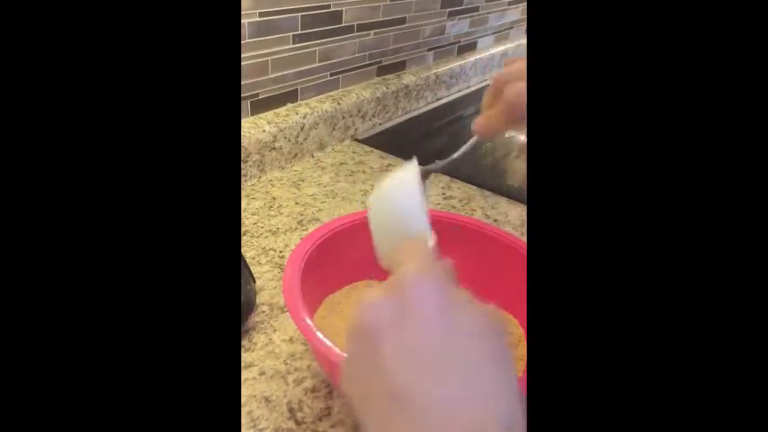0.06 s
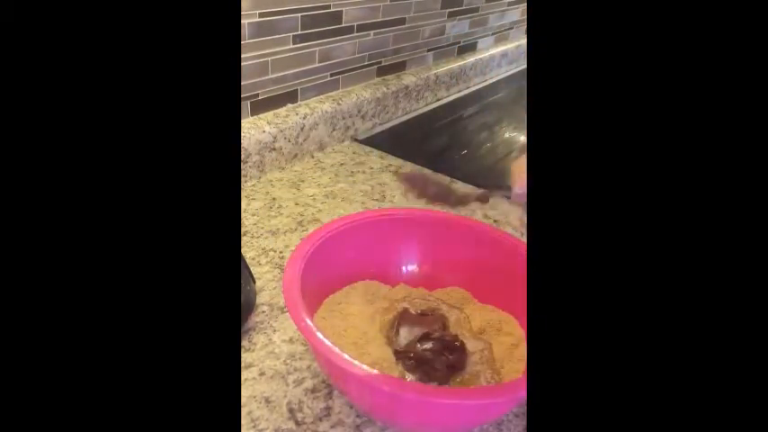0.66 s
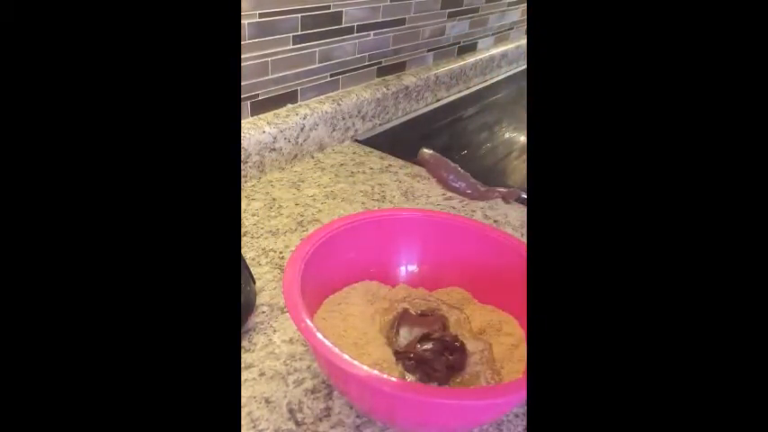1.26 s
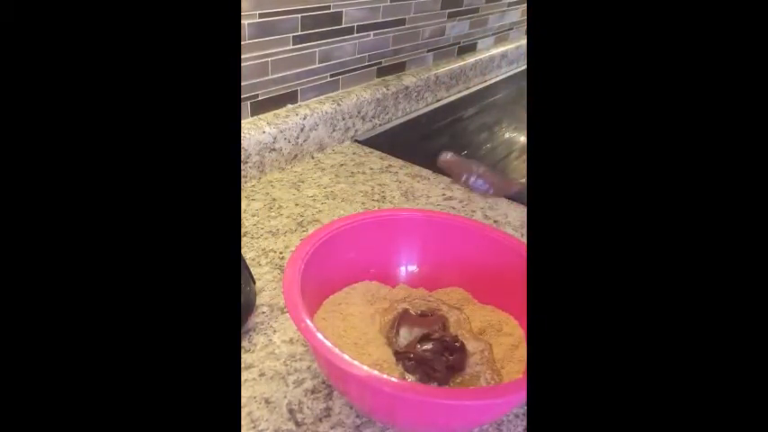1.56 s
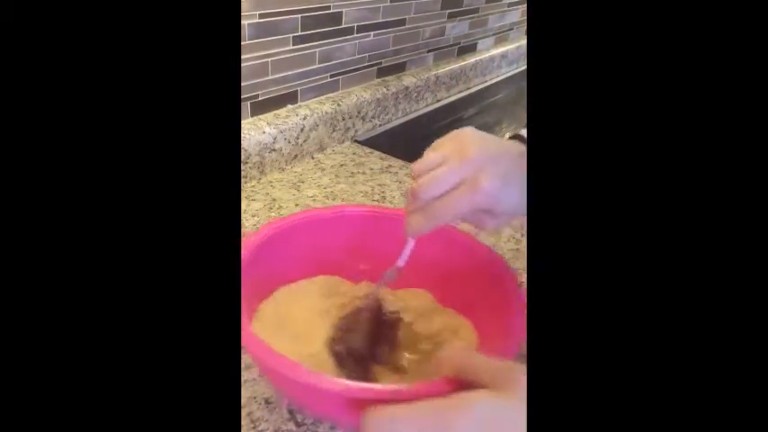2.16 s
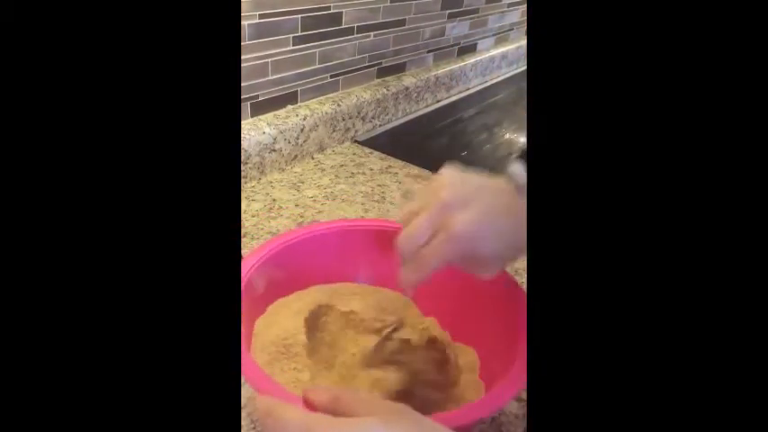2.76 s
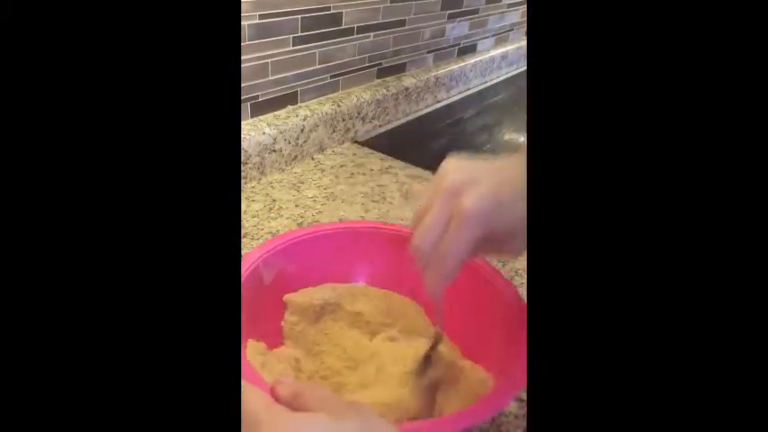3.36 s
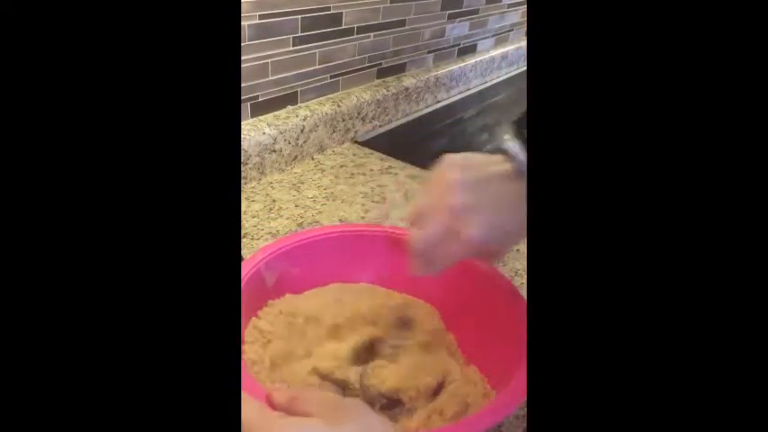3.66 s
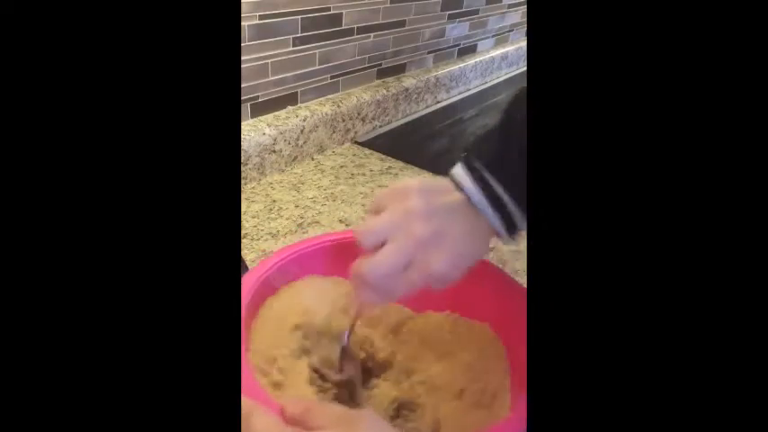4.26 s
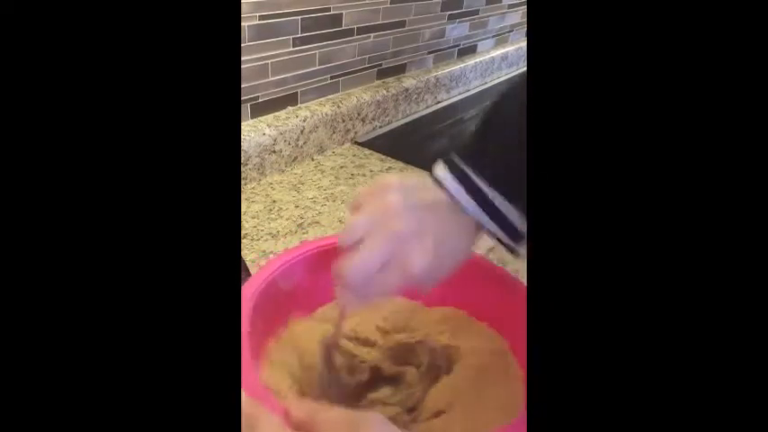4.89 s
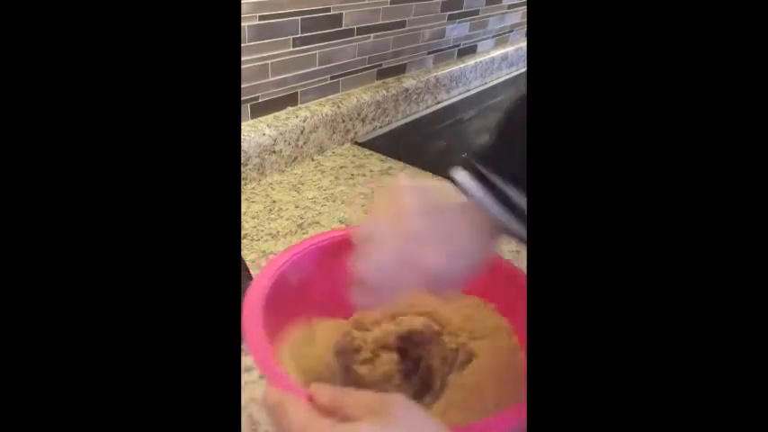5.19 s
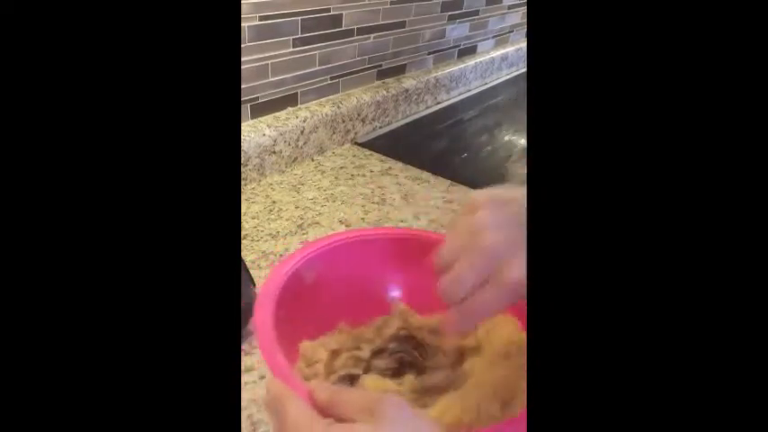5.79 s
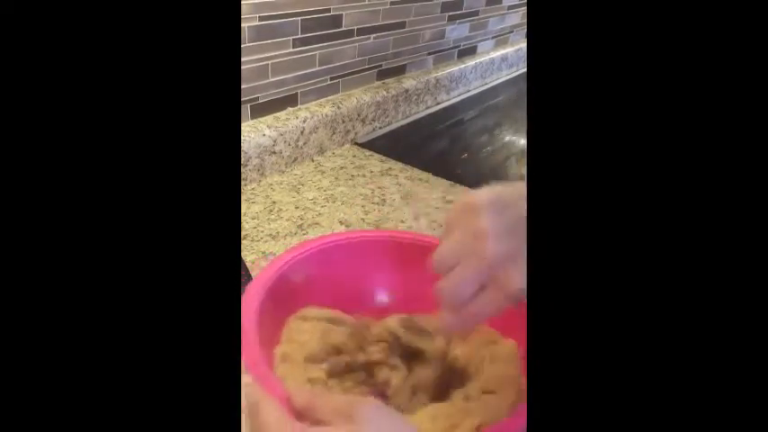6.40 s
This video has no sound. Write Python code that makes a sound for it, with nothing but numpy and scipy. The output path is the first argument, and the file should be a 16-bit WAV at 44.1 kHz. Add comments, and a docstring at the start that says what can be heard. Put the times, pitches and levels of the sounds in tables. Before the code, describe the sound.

A few light taps and a ringing scrape of a spoon in a cup are followed by a quiet moment and the clunk of the cup on a counter. Then dry, crumbly dough is stirred close by, the metal spoon skidding and knocking on the plastic bowl as the gritty crunch grows continuous. The bowl shifts with low bumps, and an appliance hums faintly in the small kitchen.

```python
"""Crumbly dough is stirred with a metal spoon in a plastic bowl. The crumbs crunch in many tiny clicks;
the spoon knocks, skids and rubs on the wall and makes it ring. Before that, the spoon taps and scrapes
out a cup and the cup is set down. The bowl bumps and judders on the stone counter of a small kitchen
with a short echo and a faint hum."""
import sys
import numpy as np
from scipy import signal
from scipy.fft import rfft, irfft
from scipy.io import wavfile
from scipy.ndimage import uniform_filter1d

SR = 44100
rng = np.random.default_rng(int(sys.argv[2]) if len(sys.argv) > 2 else 0)


def inscribe(sig):
    """Save sig as 16-bit PCM at rate SR to the path in sys.argv[1].

    A 1-D sig is mono; a 2-D sig holds one channel per row.
    Samples are clipped to [-1, 1] before scaling.
    """
    pcm = np.round(np.clip(np.atleast_2d(sig).T, -1, 1) * 32767)
    wavfile.write(sys.argv[1], SR, pcm.astype(np.int16))


N = 288414
TIME = np.arange(N) / SR
HIT_TIME = np.arange(SR // 4) / SR  # the clock for one hit
TOP_HZ = 9200  # upper limit of the treble


def gain_of(db):
    """Turns decibels into a multiplier."""
    return 10 ** (np.asarray(db) / 20)


def evened(x):
    """Scales x to an average (rms) level of 1."""
    return x / np.sqrt(np.mean(x ** 2) + 1e-20)


def look_up(points, hz):
    """Reads between a table's rows, on a scale of octaves."""
    row_hz, value = np.transpose(points)
    return np.interp(np.log(hz + 1), np.log(row_hz + 1), value)


def add(mix, start, sound):
    """Mixes a sound in at a start time in seconds."""
    part = mix[max(round(start * SR), 0):][:len(sound)]
    part += sound[:len(part)]


def coloured(x, tone):
    """Shapes the bass, middle and treble of x to follow a table."""
    gains = gain_of(look_up(tone, np.fft.rfftfreq(len(x), 1 / SR)))
    return evened(irfft(rfft(x) * gains, len(x)))


def resonate(x, hz, width):
    """Lets x excite one note; a smaller width in Hz gives a purer note."""
    pole = np.exp((2j * np.pi * hz - np.pi * width) / SR)
    return evened(signal.lfilter([1], [1, -pole], x).real)


def clicks(per_s, spread_db):
    """Tiny clicks of uneven size at random moments."""
    size = gain_of(spread_db * np.minimum(rng.exponential(1, N), 4))
    return evened(size * rng.choice([-1, 1], N) * (rng.random(N) < per_s / SR))


def strike(notes, weight, cut_hz, scatter):
    """A struck object rings with its own fading notes; a soft hit leaves out the high ones."""
    hz, db, fade_s = np.transpose(notes)[:, :, None]
    size = gain_of(db) * weight / np.sqrt(1 + (hz / cut_hz) ** 4)
    # neighbouring notes swing opposite ways
    phase = np.pi * np.arange(len(hz))[:, None] + scatter * rng.standard_normal(hz.shape)
    swell = 1 - np.exp(-HIT_TIME * hz / 1.18)  # the treble arrives first
    fade = np.exp(-np.log(1000) * HIT_TIME / fade_s)
    ring = (size * swell * fade * np.sin(2 * np.pi * hz * HIT_TIME + phase)).sum(0)
    return ring / np.sqrt(np.mean(ring[:SR // 50] ** 2))  # level 1 over the first 20 ms


def shifting(x, depth_db):
    """The tone drifts at random as the spoon travels round the bowl."""
    bands = signal.stft(x, SR, nperseg=1024, noverlap=768)[2]
    patches = uniform_filter1d(rng.standard_normal(bands.shape), size=6, axis=0)
    patches = evened(uniform_filter1d(patches, size=14, axis=1))
    drifted = signal.istft(bands * gain_of(depth_db * patches), SR, nperseg=1024, noverlap=768)[1]
    return evened(drifted[:N])


def envelope(start, length, rise_s, fade_s):
    """A level that rises smoothly, holds and dies away."""
    t = np.maximum(TIME - start, 0)
    rise = np.sin(np.pi / 2 * np.minimum(t / rise_s, 1)) ** 2
    return rise * np.exp(-np.maximum(t - length, 0) / fade_s)


# the tone of the room's air: (frequency [Hz], relative level [dB])
AIR_TONE = [(15, -82.5), (25, -22.5), (102, -0.5), (130, -6), (151, -23), (184, -14), (308, -18.5),
            (332, -24.5), (394, -15.5), (543, -23.5), (599, -14), (678, -24), (934, -24), (1730, -28.5),
            (9000, -41.5), (11700, -84), (19800, -120)]
# an appliance's notes: (pitch [Hz], width [Hz], level [dB])
HUM_NOTES = [(56.3, 4.1, -81), (102.2, 3.5, -75), (907.6, 21, -84)]
def background():
    """Room air and the unsteady hum of an appliance."""
    hum = sum(gain_of(db) * resonate(resonate(rng.standard_normal(N), hz, width), hz, width)
              for hz, width, db in HUM_NOTES)
    return hum + gain_of(-69) * coloured(rng.standard_normal(N), AIR_TONE)


# how long the room echoes: (frequency [Hz], time to fade by 60 dB [s])
ECHO_TIMES = [(100, 0.38), (500, 0.42), (1100, 0.4), (1900, .29), (3000, 0.21), (8000, 0.17)]
def kitchen_echo(x):
    """Sound bounces off tiles and cupboards; the treble dies first."""
    bounces = rng.choice([-1., 1.], SR // 2) * (rng.random(SR // 2) < 3000 / SR)
    bounces[:SR // 125] = 0  # nothing returns for 8 ms
    hz, t, bands = signal.stft(bounces, SR, nperseg=256)
    fade = np.exp(-np.log(1000) * t / look_up(ECHO_TIMES, hz)[:, None])
    tail = signal.istft(bands * fade, SR, nperseg=256)[1]
    return signal.fftconvolve(x, tail / np.linalg.norm(tail))[:N]


# the spoon is lifted: (time [s], level [dB], pitch [Hz], time to fade by 60 dB [s])
SPOON_TINK = (1.506, -65, 2950, .055)
def tink():
    """Lightly touched metal rings with one faint note."""
    start, db, hz, fade_s = SPOON_TINK
    t = np.maximum(TIME - start, 0)
    level = gain_of(db) * (1 - np.exp(-t / 0.0023)) * np.exp(-np.log(1000) * t / fade_s)
    return level * np.sin(2 * np.pi * hz * t)


# the notes of a bump on the counter: (pitch [Hz], relative level [dB], time to fade by 60 dB [s])
COUNTER_NOTES = [(98, -0.5, 0.066), (229.3, 3.5, 0.066), (307.5, -11.5, 0.08), (384, -1, 0.048),
                 (544, -9.5, 0.056), (644, 4, 0.023), (780, -4, 0.027), (930, -1, 0.018),
                 (1092, -15, 0.045), (1660, -36, 0.023), (1710, -29, 0.043), (2140, -16, 0.018)]
# the tone of a bump's puff of noise: (frequency [Hz], relative level [dB])
PUFF_TONE = [(30, -24), (110, 0), (160, -9.5), (250, 8), (400, 0), (650, -3), (1100, -17.5), (1500, -31),
             (4000, -37)]
# the cup rocks down and the bowl bumps: (time [s], level [dB], treble cut-off [Hz])
THUDS = [(0.094, -55, 198), (1.488, -70, 121), (1.5977, -32.5, 970), (1.6115, -36.5, 576),
         (1.62, -40.5, 760), (1.9094, -58.5, 286), (1.964, -63, 146.5), (2.1204, -59.5, 342),
         (2.3437, -49, 284), (2.413, -56, 293), (5.0916, -53, 316), (5.115, -63, 252), (5.79, -60, 90.5),
         (6.105, -52.5, 102), (6.144, -56, 353), (6.445, -50.5, 148)]
def thuds():
    """Dull blows on the counter. Returns the sound close by and the sound sent into the room."""
    near, around = np.zeros((2, N))
    for start, db, cut_hz in THUDS:
        muffle = signal.butter(4, min(1.76 * cut_hz, TOP_HZ), fs=SR, output="sos")
        ring = signal.sosfilt(muffle, strike(COUNTER_NOTES, 1, cut_hz, scatter=0.47))
        noise = coloured(rng.standard_normal(len(HIT_TIME)), PUFF_TONE)
        puff = signal.sosfilt(muffle, noise) * np.exp(-HIT_TIME / 0.013)
        add(near, start, gain_of(db) * (ring + gain_of(-7) * puff))
        add(around, start, gain_of(db) * (gain_of(-8) * ring + gain_of(2.5) * puff))
    return np.array([near, around])


# the bowl slips on the counter: (start [s], length [s], level [dB])
JUDDERS = [(2.654, 0.027, -44.5), (2.687, 0.048, -47)]
def judder(hz=213):
    """The bowl's foot sticks and slips at the rate the bowl naturally rocks."""
    phase = 2 * np.pi * hz * TIME
    level = sum(gain_of(db) * envelope(start, length, rise_s=0.018, fade_s=0.006)
                for start, length, db in JUDDERS)
    return level * evened(np.sin(phase) + gain_of(-20.5) * np.sin(2 * phase))


def rumble(grinding):
    """Each stroke pushes the bowl about on its foot, with a low rumble."""
    low_noise = resonate(rng.standard_normal(N), hz=74, width=32)
    return gain_of(-11.5) * grinding * resonate(low_noise, hz=79.4, width=37)


def rubbing(pressure):
    """Steady rubbing makes one note of the wall sing faintly."""
    hiss = resonate(rng.standard_normal(N), hz=2330, width=400)
    return pressure * resonate(hiss, hz=2270, width=340)


# the tone of a skid: (frequency [Hz], relative level [dB])
SKID_TONE = [(300, -29), (800, -1.5), (1200, -6.5), (1550, -7), (2000, 1), (2400, 0), (3100, -5),
             (4300, -1.5), (5000, -13), (5800, -9), (7000, -12.5), (9000, -24)]
# the spoon's own notes: (pitch [Hz], width [Hz], relative level [dB])
SPOON_NOTES = [(1604, 110, -11.5), (2810, 90, -13), (3720, 35, -2), (4420, 190, -8), (5490, 640, -7)]
# the spoon's edge skids: (peak time [s], level [dB], length [s], relative ring [dB], bass cut-off [Hz])
SKIDS = [(0.122, -68.5, 0.029, -15, 990), (0.221, -54.5, 0.063, -26, 6400), (0.264, -52, 0.01, 1, 3000),
         (0.282, -41, 0.013, -3.5, 3400), (0.52, -58.5, 0.0022, -36, 6060), (1.845, -77, 0.014, -4, 2000),
         (2.343, -50.5, 0.012, -18, 500), (2.72, -57, 0.047, -27, 900), (2.763, -56, 0.021, -5, 1500),
         (3.067, -48, 0.021, -23, 1840), (3.653, -43.5, 0.0051, -18, 800), (4.133, -49, 0.0098, -20, 600),
         (4.257, -50, 0.0082, -18, 600), (4.817, -45.5, 0.005, -29, 900), (4.897, -49, 0.018, -26, 600),
         (5.217, -50.5, 0.0046, -18, 603), (5.524, -48, 0.015, -19, 600), (5.695, -46, 0.0064, -32, 600),
         (5.776, -45.5, 0.017, -34, 604), (5.878, -43, 0.021, -18, 600), (6.127, -44, 0.013, -32, 600),
         (6.435, -46, 0.0076, -15, 586), (6.507, -45, 0.005, -11, 2000)]
def skids():
    """Tiny slips in the cup and bowl rasp and set the spoon ringing; each skid has its own bass cut-off."""
    slips = clicks(per_s=5000, spread_db=1.5)
    rasp = shifting(coloured(slips, SKID_TONE), depth_db=-1.5)
    ring = evened(sum(gain_of(db) * resonate(slips, hz, width) for hz, width, db in SPOON_NOTES))
    out = np.zeros(N)
    for peak, db, length, ring_db, low_hz in SKIDS:
        during = abs(TIME - peak) < 2 * length
        level = gain_of(db) * np.exp(-2 * ((TIME[during] - peak) / length) ** 2)
        thin_rasp = signal.lfilter(*signal.butter(2, low_hz, "highpass", fs=SR), rasp[during])
        out[during] += level * (thin_rasp + gain_of(ring_db) * ring[during])
    return out


def spot_boost(hz, spot_hz, boost_db):
    """The struck spot boosts notes near its own pitch by this many dB."""
    return boost_db * np.exp(-(np.log2(hz / spot_hz) / 0.46) ** 2)


# the wall's many short notes, blurred together: (frequency [Hz], relative level [dB])
WALL_TONE = [(40, -45.5), (160, -20.5), (270, 1.5), (450, -2.5), (750, -2.5), (1400, -5.5), (2400, -2.5),
             (4000, -15.5), (9000, -18)]
def chatter(cut_hz, spot_hz, boost_db, drag_s):
    """The spoon drags on after landing and shakes the whole wall."""
    hz = np.geomspace(30, 16000, 60)
    treble_loss = 10 * np.log10(1 + (hz / cut_hz) ** 4)
    db = look_up(WALL_TONE, hz) + 0.65 * spot_boost(hz, spot_hz, boost_db) - treble_loss
    noise = coloured(rng.standard_normal(len(HIT_TIME)), np.c_[hz, db])
    burst = noise * (1 - np.exp(-HIT_TIME / 0.00044)) * np.exp(-HIT_TIME / drag_s)
    return burst / np.sqrt(np.mean(burst[:SR // 50] ** 2))


# the tone of breaking crumbs: (frequency [Hz], relative level [dB])
CRUMB_TONE = [(40, -40), (150, -34.5), (300, -20), (800, -22.5), (1300, -7.5), (1800, -7), (2350, -2),
              (3000, -2.5), (4200, -6.5), (5000, -10.5), (5800, -8.5), (7400, -14), (9000, -14)]
def crumbs(x):
    """Gives noise or clicks the dry sound of crumbs."""
    return coloured(x, CRUMB_TONE)


# the bowl, muted by dough and a hand: (pitch [Hz], relative level [dB], time to fade by 60 dB [s])
BOWL_NOTES = [(198.4, -12.5, 0.077), (263, 1.5, 0.024), (329.4, -3, 0.049), (362, 0, 0.051),
              (526, -8.5, 0.1), (608, -8.5, 0.11), (684, -14, 0.032), (765, -3, 0.045), (857, -6, 0.023),
              (930, 1.5, 0.025), (1066, -3.5, 0.051), (1120, 2, 0.024), (1157, 0.5, 0.02),
              (1290, -6, 0.041), (1374, -3.5, 0.029), (1597, -1.5, 0.033), (1880, 1, 0.02),
              (2013, 2, 0.022), (2337, 4, 0.026), (2644, 2, 0.019), (2975, 10.5, 0.0068),
              (3630, -10.5, 0.02), (3620, 2, 0.018), (4265, 4, 0.0069), (3740, -16, 0.0075)]
# the spoon hits plastic:
# (time [s], level [dB], treble cut-off [Hz], pitch of the spot [Hz], its boost [dB], drag [s])
KNOCKS = [(0.09, -51, 1750, 1270, 15.5, 0.0012), (0.118, -60.5, 1860, 297, 18, 0.0054),
          (2.337, -48.5, 4200, 1480, 10, 0.009), (2.478, -54.5, 3020, 2330, 13, 0.0045),
          (2.7575, -38, 2130, 760, 5, 0.016), (3.1526, -27, 2270, 1980, 12, 0.0013),
          (3.1547, -29.5, 1640, 920, 11, 0.0024), (3.654, -33.5, 980, 368, 10, 0.016),
          (3.802, -60, 1800, 1230, 14, 0.0023), (3.848, -52, 1420, 1230, 3, 0.0087),
          (4.1374, -47.5, 2600, 1300, 8.5, 0.0074), (4.1992, -59.5, 2570, 1250, 14, 0.0028),
          (4.2441, -49, 3400, 1320, 24, 0.0047), (4.369, -57, 3000, 1430, 17, 0.0018),
          (4.427, -61.5, 2980, 1390, 22, 0.00079), (4.478, -53.5, 1800, 516, 7, .008),
          (4.509, -53.5, 695, 507, 18, 0.013), (4.591, -67, 900, 513, 17, .005),
          (4.7779, -46.5, 3000, 1540, 16, 0.027), (4.821, -39.5, 2200, 1000, 8.5, .007),
          (4.851, -54, 2620, 1510, 11, 0.0013), (4.9048, -37, 2200, 500, 11, 0.0059),
          (5.2235, -27.5, 2360, 560, 15, 0.0047), (5.234, -39, 900, 280, 19, 0.0055),
          (5.528, -44.5, 905, 470, 16, 0.0092), (5.5892, -35.5, 1700, 524, 18.5, 0.006),
          (5.693, -42, 2600, 1150, 14, 0.0063), (5.695, -47, 1190, 330, 20, .007),
          (5.776, -46, 4180, 2420, 13, 0.0061), (5.8693, -51, 3450, 1900, 7, 0.0073),
          (5.873, -52, 1000, 505, 15, 0.019), (5.965, -45.5, 1500, 1190, 8, 0.0029),
          (6.3881, -52, 2200, 1147, 14, 0.0093), (6.404, -46.5, 2400, 1350, 11, 0.024),
          (6.4412, -38, 2000, 470, 13.5, 0.0041), (6.5153, -33.5, 1470, 580, 17.5, 0.016)]
def knocks():
    """The spoon taps the cup at first, then knocks on the bowl and crushes crumbs."""
    near, around = np.zeros((2, N))  # heard close by, sent into the room
    for start, db, cut_hz, spot_hz, boost_db, drag_s in KNOCKS:
        notes = np.array(BOWL_NOTES)
        notes[:, 0] *= 1 + 0.015 * rng.standard_normal(len(notes))  # moving dough retunes the notes
        notes[:, 2] *= (drag_s / 0.0038) ** 0.18  # a dead stop chokes the ring, a drag keeps it going
        ring = strike(notes, gain_of(spot_boost(notes[:, :1], spot_hz, boost_db)), cut_hz, scatter=0.58)
        drag = chatter(cut_hz, spot_hz, boost_db, drag_s)
        crush = crumbs(rng.standard_normal(len(HIT_TIME))) * np.exp(-HIT_TIME / (drag_s + 0.0016))
        crush = signal.lfilter(*signal.butter(2, min(2.57 * cut_hz, TOP_HZ), fs=SR), crush)
        add(near, start, gain_of(db) * (gain_of(-2.1) * ring + gain_of(-6) * drag + gain_of(-9) * crush))
        add(around, start, gain_of(db) * (gain_of(-12) * ring + gain_of(-3) * drag + gain_of(-8) * crush))
    return signal.lfilter(*signal.butter(2, 150, "highpass", fs=SR), np.array([near, around]))


# the stirring strokes: (start [s], length [s], crunch [dB], grinding [dB], rubbing [dB])
STROKES = [(1.912, 0.36, -78, -74.5, -78), (2.056, 0.24, -62.5, -65, -83), (2.386, 0.12, -63.5, -59.5, -81),
           (2.512, 0.13, -75, -61.5, -66), (2.67, 0.08, -58.5, -59, -59),
           (2.824, 0.094, -101, -69.5, -63.5), (3.052, 0.032, -50, -59, -58), (3.408, 0.18, -57, -67, -62),
           (3.637, 0.3, -60, -64, -77), (3.842, 0.11, -53, -66, -63), (3.986, 0.16, -54, -63, -74),
           (4.185, 0.12, -53, -69, -60.5), (4.331, 0.14, -52.5, -60, -71), (4.507, .12, -52, -63, -60),
           (4.64, 0.21, -53.5, -66.5, -63), (4.84, 0.24, -54.5, -76, -62), (5.083, 0.22, -55.5, -61.5, -68),
           (5.284, 0.22, -52.5, -61.5, -57.5), (5.468, 0.34, -53, -58.5, -60.5),
           (5.816, 0.18, -54.5, -61.5, -66), (5.996, 0.2, -53.5, -56.5, -67),
           (6.144, 0.47, -52.5, -65, -60)]
def strokes():
    """How hard the spoon crunches, grinds and rubs: it bites in, holds, then lets the crumbs settle."""
    shapes = np.array([envelope(start, length, rise_s=0.37 * length, fade_s=0.058)
                       for start, length, *_ in STROKES])
    levels = gain_of(np.array(STROKES)[:, 2:].T)
    return np.sqrt(levels ** 2 @ shapes ** 2)  # overlapping strokes add in power


def stirring(crunching, grinding):
    """Dry crumbs slide in clumps and a few snap; a deep stroke grinds them on the bowl, which rings."""
    clumps = evened(uniform_filter1d(uniform_filter1d(rng.standard_normal(N), size=250), size=150))
    slides = clicks(per_s=5000, spread_db=1.0)
    snaps = gain_of(-11.5) * clicks(per_s=160, spread_db=-2.5)
    crunch = shifting(crumbs(slides + snaps), depth_db=2.3)
    grit = clicks(per_s=2000, spread_db=3.0)
    bowl_ring = strike(BOWL_NOTES, 1, cut_hz=8200, scatter=0.9)
    grind = evened(signal.fftconvolve(grit, bowl_ring)[:N])
    return (crunching * crunch + grinding * grind) * gain_of(0.75 * clumps)


def scene():
    """Mixes the hits and the scraping with their echo and the background."""
    crunching, grinding, pressure = strokes()
    bass_cut = signal.butter(2, 75, "highpass", fs=SR)  # small things give off no deep bass
    hits, hits_around = signal.lfilter(*bass_cut, knocks() + thuds() + tink())
    scraping = stirring(crunching, grinding) + skids() + rubbing(pressure)
    near = hits + scraping + judder() + rumble(grinding)
    echo = kitchen_echo(gain_of(-11.5) * hits_around + gain_of(-13) * scraping)
    return (near + echo + background())[None]


def record(dry):
    """Cuts off the highest treble steeply."""
    treble_cut = signal.firwin(601, TOP_HZ, window=("kaiser", 8), fs=SR)
    return signal.oaconvolve(dry, treble_cut[None], "same")


dry = scene()
out = record(dry)
inscribe(out)
```